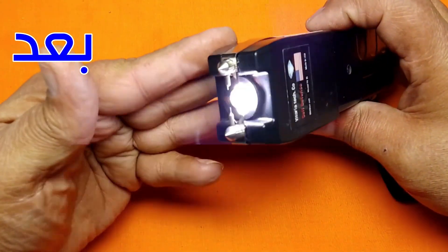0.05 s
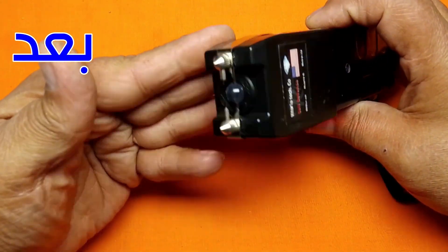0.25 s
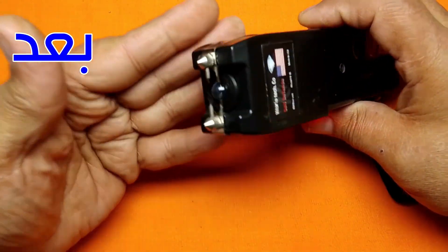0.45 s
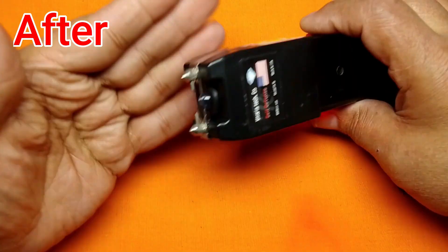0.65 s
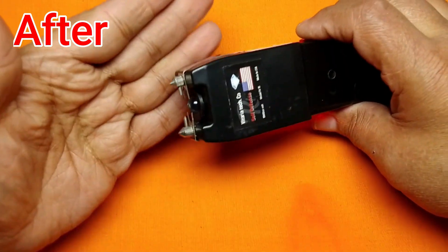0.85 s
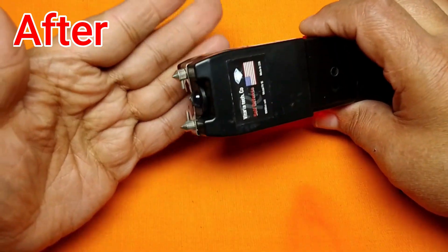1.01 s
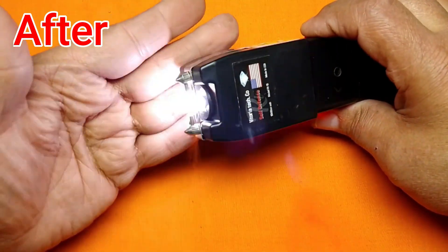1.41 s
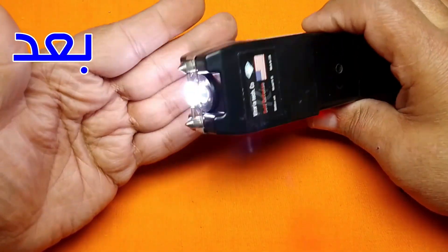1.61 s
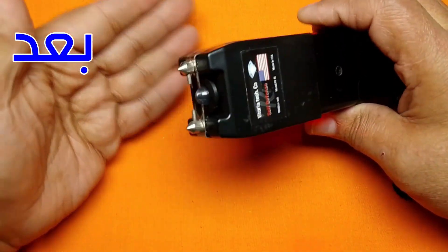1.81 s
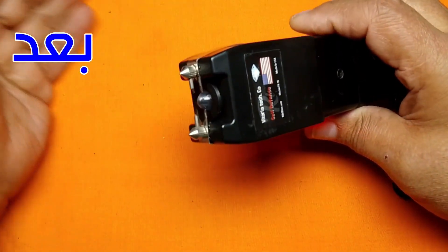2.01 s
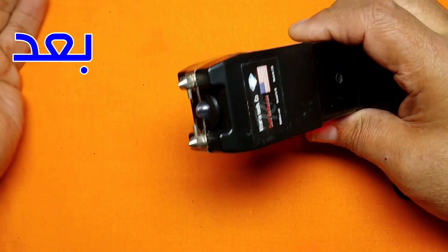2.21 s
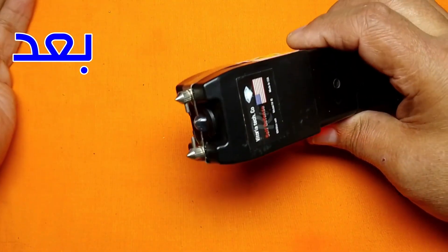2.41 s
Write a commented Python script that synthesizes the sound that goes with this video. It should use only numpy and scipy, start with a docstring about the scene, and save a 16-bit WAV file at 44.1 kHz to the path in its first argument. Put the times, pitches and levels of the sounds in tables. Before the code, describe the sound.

A stun gun fires two short, harsh bursts of rapid crackling, each started by a switch click. Between them the plastic case ticks lightly in the hand. The close sparks overload the microphone in a small, quiet room.

```python
"""A switch clicks, a faint whine rises, and a stun gun breaks into a harsh crackle: two short bursts,
close to a phone in a small, quiet room. The converter whines as it charges, then sparks jump about
28 times a second. Their cracks and the room's ring overload the microphone into a rasp with a thump
per spark; the ring then dies away. The case ticks lightly and the hand shifts its grip."""
import sys
import numpy as np
from scipy import signal
from scipy.fft import rfft, irfft
from scipy.io import wavfile
from scipy.ndimage import uniform_filter1d

SR = 44100
rng = np.random.default_rng(int(sys.argv[2]) if len(sys.argv) > 2 else 0)


def store_pcm(level_fs):
    """Save levels as 16-bit WAV."""
    pcm = np.round(np.clip(level_fs, -1, 1) * 32767).astype(np.int16)
    wavfile.write(sys.argv[1], SR, np.atleast_2d(pcm).T)


N = 112454


def undb(db):
    """Level in dB to gain."""
    return 10 ** (np.asarray(db) / 20)


def fade(t, t60_s):
    """Exponential decay, 60 dB in t60_s."""
    return np.exp(-np.log(1000) * t / t60_s)


def colour(x, points):
    """Causal filter through (Hz, dB) points; white noise keeps its level."""
    size = 8192
    hz, db = np.array(points, float).T
    bin_hz = np.arange(size // 2 + 1) * SR / size
    gain = undb(np.interp(np.log(bin_hz + 1), np.log(hz), db))
    cepstrum = irfft(np.log(gain / np.sqrt(np.mean(gain ** 2))))
    cepstrum[1:size // 2] *= 2  # fold to minimum phase
    cepstrum[size // 2 + 1:] = 0
    return signal.fftconvolve(x, irfft(np.exp(rfft(cepstrum))))[:len(x)]


def wavering_tone(hz, width_hz):
    """Narrow-band noise, unit RMS."""
    offset_hz = np.arange(N // 2 + 1) * SR / N - hz
    band = irfft(rfft(rng.standard_normal(N)) / (1 + (2 * offset_hz / width_hz) ** 2), N)
    return band / band.std()


def add(out, at_s, sound):
    """Mix a sound in at at_s."""
    i = int(at_s * SR)
    out[i:i + len(sound)] += sound[:N - i]


def strike(modes, t):
    """Damped modes, slightly detuned per blow."""
    out = np.zeros(len(t))
    for k, (hz, db, t60_s) in enumerate(modes):
        detuned_hz = hz * (1 + 0.014 * rng.standard_normal())
        out += (-1) ** k * undb(db) * fade(t, t60_s) * np.sin(2 * np.pi * detuned_hz * t)
    return out


# Room noise spectrum (frequency [Hz], gain [dB])
FLOOR_SPECTRUM = [(25, -1.5), (60, -6), (120, -3.5), (170, -9), (250, -10), (420, -16.5), (800, -19),
                  (1400, -19), (2200, -21), (3200, -24.5), (5200, -32.5), (7500, -43), (10000, -56.5),
                  (16000, -58)]
# Room hum (frequency [Hz], level [dB])
HUM_TONES = [(66, -52), (119, -50.5), (1930, -62), (2019, -67.5)]
def background(floor_db=-46.5):
    """Low room noise and a wavering hum."""
    hum = sum(undb(db) * wavering_tone(hz, width_hz=12.5) for hz, db in HUM_TONES)
    return undb(floor_db) * colour(rng.standard_normal(N), FLOOR_SPECTRUM) + hum


# Case modes under the hand (frequency [Hz], gain [dB], t60 [s])
KNOCK_MODES = [(254, 6, 0.026), (666, -1, 0.026), (930, -4, .03), (1267, 6.5, 0.041), (1710, 3, 0.03),
               (2410, 2, .035)]
# Grip shifts (centre time [s], half-width [s], frequency [Hz], level [dB])
GRIP_RUMBLES = [(1.225, 0.17, 68.5, -47.5), (1.617, 0.056, 84, -35)]
def hand(knock_s=1.021, knock_db=-37):
    """The hand knocks the case once and rumbles as it shifts."""
    out, t = np.zeros(N), np.arange(SR // 6) / SR
    add(out, knock_s, undb(knock_db) * strike(KNOCK_MODES, t))
    for at_s, half_width_s, hz, db in GRIP_RUMBLES:
        envelope = np.exp(-((np.arange(N) / SR - at_s) / half_width_s) ** 2)
        out += undb(db) * envelope * wavering_tone(hz, width_hz=9.7)
    return out


# Snap spectrum (frequency [Hz], gain [dB])
SNAP_SPECTRUM = [(200, -36), (800, -26), (1600, 0), (4300, 1.5), (7300, -9), (11000, -48), (16000, -29)]
def snap(t, t60_s=0.029):
    """Plastic snap: a decaying noise burst."""
    return colour(rng.standard_normal(len(t)) * fade(t, t60_s), SNAP_SPECTRUM)


# Switch and plastic case modes (frequency [Hz], gain [dB], t60 [s])
CASE_MODES = [(1070, -15, 0.054), (1600, 4, 0.018), (1760, 2.5, 0.032), (2010, 3, 0.02), (2680, 5, .024),
              (3520, 4.5, 0.0076), (4440, -2.5, 0.027), (4970, -11.5, 0.014), (6720, -31, 0.011)]
# Light ticks (time [s], gain [dB])
CASE_TICKS = [(.228, -24), (.783, -29), (0.803, -37), (0.814, -35), (0.874, -33.5), (2.2842, -25)]
def ticks(gain_db=-16, snap_db=11.5):
    """Switch and case tick: a snap plus ringing modes."""
    out, t = np.zeros(N), np.arange(SR // 6) / SR
    for at_s, db in CASE_TICKS:
        add(out, at_s, undb(gain_db + db) * (strike(CASE_MODES, t) + undb(snap_db) * snap(t)))
    return out


# Brief high whine at each press (frequency [Hz], gain [dB], t60 [s])
PRESS_WHINE_MODES = [(14900, -22, 0.023), (15600, -32, 0.025)]
# Switch presses (time [s], gain [dB], charge time [s])
SWITCH_PRESSES = [(0.231, 0.5, 0.032), (1.6554, -1, .017)]
def switch(click_db=-13, snap_db=-2.5, room_db=-24, room_t60_s=0.3):
    """Each press snaps and rings the case and the room, with a brief high whine."""
    out, t = np.zeros(N), np.arange(SR // 6) / SR
    for at_s, db, _ in SWITCH_PRESSES:
        click = strike(CASE_MODES, t) + undb(snap_db) * snap(t) + undb(room_db) * snap(t, room_t60_s)
        add(out, at_s, undb(db) * (undb(click_db) * click + strike(PRESS_WHINE_MODES, t)))
    return out


def converter(start_hz=13940, rise_hz_per_s=17000, gain_db=-33.5, attack_s=0.023, t60_s=0.08):
    """The whine rises while the converter charges, then fades."""
    out, t = np.zeros(N), np.arange(SR // 8) / SR
    for at_s, _, charge_s in SWITCH_PRESSES:
        hz = start_hz + rise_hz_per_s * np.minimum(t, charge_s)
        envelope = np.minimum(t / attack_s, 1) * fade(np.maximum(t - charge_s, 0), t60_s)
        add(out, at_s, undb(gain_db) * envelope * np.sin(2 * np.pi * np.cumsum(hz) / SR))
    return out


# Overload rasp spectrum (frequency [Hz], gain [dB])
RASP_SPECTRUM = [(25, -6), (70, -9), (150, 2.5), (300, -0.5), (580, 1), (1000, -1.5), (2000, -2),
                 (3000, -5.5), (4500, -10.5), (7000, -32.5), (10000, -29.5), (16000, -37)]
# Rasp swell (time [s], gain [dB])
RASP_ENVELOPE = [(.27, 2), (0.336, 2.5), (.36, 3.5), (.385, 0), (.44, 4.5), (.475, -1.5), (.525, 4.5),
                 (.58, 1), (1.68, 0.5), (1.705, -2), (1.747, 5), (1.777, -0.5), (1.85, -1), (1.9, 2.5),
                 (1.95, 2), (2.0, 0)]
def overload(x, window_s=0.005, ratio=27, rail=1.3, knee_db=2.5, limited_db=-20.5, rasp_db=-12):
    """A fast limiter holds the input down; above the rail the flattened wave breaks into a low rasp."""
    power = uniform_filter1d(x ** 2, int(window_s * SR))
    limited = x * np.maximum(power, 1) ** (-(1 - 1 / ratio) / 2)
    over_db = 10 * np.log10(np.abs(power) / rail ** 2 + 1e-12)
    depth = (1 + np.tanh(over_db / knee_db)) / 2
    flattened = np.tanh(2 * limited)
    rasp = colour(depth * flattened * rng.choice([-1, 1], N), RASP_SPECTRUM)
    swell_db = np.interp(np.arange(N) / SR, *np.array(RASP_ENVELOPE).T)
    return undb(limited_db) * limited + undb(rasp_db + swell_db) * rasp


# Sparks (time [s], crack gain [dB], thump gain [dB])
DISCHARGES = [(.266, 2.5, 0), (.301, 0.5, -1), (.329, 6.5, -4), (.344, 9.5, 9), (.378, 10.5, 3),
              (.406, 5, -11), (.419, 5.5, 3.5), (.449, 0, 3.5), (.485, -4.5, 0.5), (.519, -1, 7),
              (.546, -3.5, -4), (1.672, 1, 5.5), (1.715, -3, 4), (1.733, 1, -16), (1.749, 0, 5.5),
              (1.785, -1.5, 5.5), (1.821, 0.5, 7), (1.855, -0.5, 2.5), (1.893, -0.5, 4), (1.927, -5.5, 4.5),
              (1.958, -3, -6)]
def thumps(median_hz=67.5, log_spread=0.32, attack_s=0.0042, t60_s=0.048, gain_db=-2.5):
    """Each spark kicks the microphone into a short low swing."""
    out, t = np.zeros(N), np.arange(SR // 8) / SR
    envelope = (1 - np.exp(-t / attack_s)) * fade(t, t60_s)
    for at_s, _, db in DISCHARGES:
        hz = median_hz * np.exp(log_spread * rng.standard_normal())
        add(out, at_s, undb(gain_db + db) * envelope * np.sin(2 * np.pi * hz * t))
    return out


# Spectrum of crack and room ring (frequency [Hz], gain [dB])
SPARK_SPECTRUM = [(150, -33), (400, -21), (1000, -13), (2000, -2.5), (3500, -3), (5200, -0.5), (7200, -3.5),
                  (8600, -10.5), (12800, -20.5), (14800, -15.5), (16000, -19.5)]
def sparks(crack_db=12, crack_t60_s=0.0034, room_db=13.5, late_db=-36, late_t60_s=0.93):
    """Each spark is a short crack and a dense room ring whose top dies first."""
    split_hz, low_t60_s, top_t60_s = 9200, 0.3, 0.24
    likeness = 0.45  # share of ring power common to all sparks
    out, t = np.zeros(N), np.arange(SR * 3 // 4) / SR
    lowpass = signal.butter(2, split_hz, fs=SR, output="sos")
    shared_noise = rng.standard_normal(len(t))
    for at_s, db, _ in DISCHARGES:
        crack_noise, own_noise, late_noise = rng.standard_normal((3, len(t)))
        crack = undb(crack_db) * crack_noise * fade(t, crack_t60_s)
        reflections = np.sqrt(likeness) * shared_noise + np.sqrt(1 - likeness) * own_noise
        low = signal.sosfilt(lowpass, reflections)
        early = low * fade(t, low_t60_s) + (reflections - low) * fade(t, top_t60_s)
        late = undb(late_db) * signal.sosfilt(lowpass, late_noise) * fade(t, late_t60_s)
        add(out, at_s, undb(db) * (crack + undb(room_db) * (early + late)))
    return colour(out, SPARK_SPECTRUM)


def scene():
    """One microphone, the same in both channels."""
    mono = overload(sparks()) + thumps() + switch() + ticks() + hand() + converter() + background()
    return np.array([mono, mono])


def record(dry):
    """The phone rounds the highest peaks and cuts the top."""
    cutoff_hz = 15750
    rounded = dry / (1 + dry ** 6) ** (1 / 6)
    return signal.sosfilt(signal.ellip(10, 0.2, 80, cutoff_hz, fs=SR, output="sos"), rounded)


dry = scene()
out = record(dry)
store_pcm(out)
```